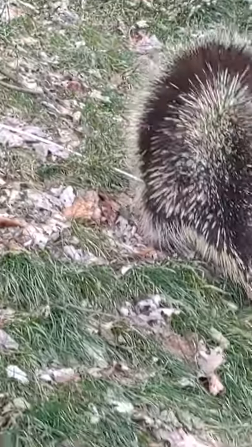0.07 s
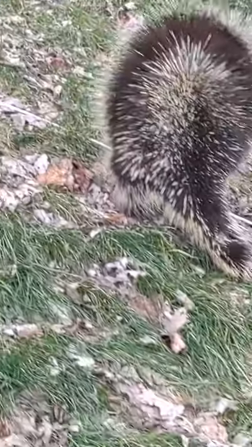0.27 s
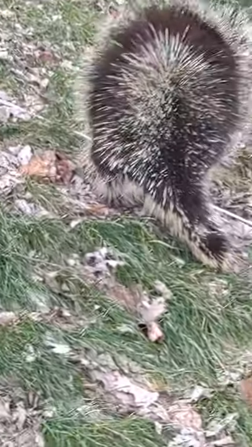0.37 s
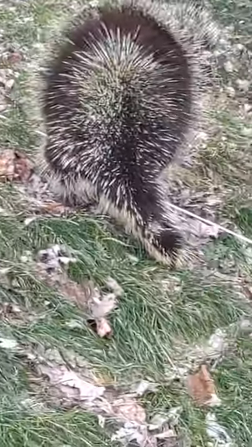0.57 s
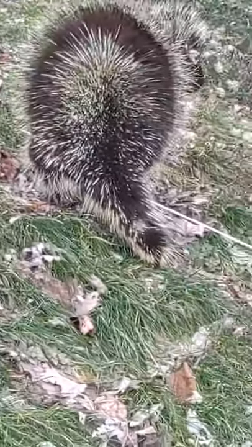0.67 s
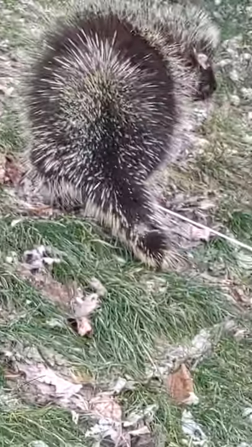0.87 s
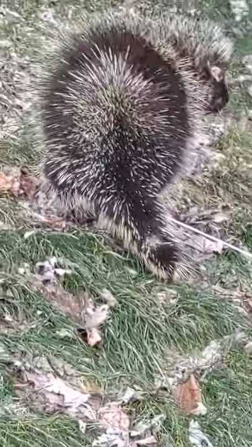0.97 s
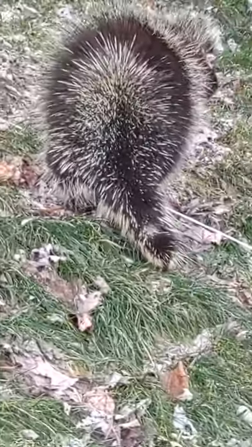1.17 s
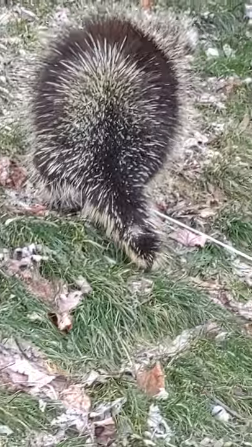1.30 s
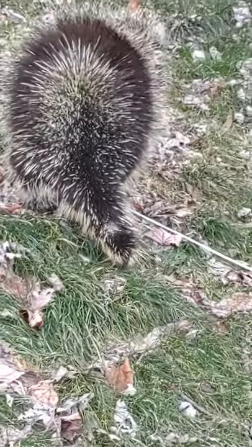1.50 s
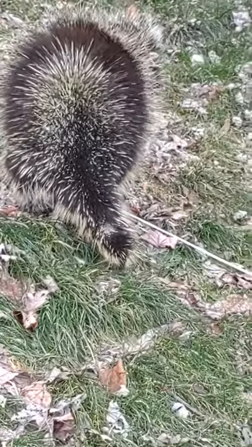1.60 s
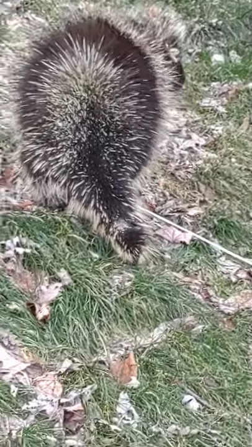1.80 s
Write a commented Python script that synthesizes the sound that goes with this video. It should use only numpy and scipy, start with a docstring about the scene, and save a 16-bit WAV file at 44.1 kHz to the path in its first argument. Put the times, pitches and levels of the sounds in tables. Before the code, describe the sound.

A crisp, hissy rustle of dry leaves comes in uneven surges as a nearby porcupine walks and drags its tail. Small stems snap and feet knock softly, then it briefly stops and resumes. The quiet yard hums faintly.

```python
"""A quiet yard with a faint low hum; a porcupine in grass and dry leaves, two metres or so from the mic.
It starts softly, each push of a foot or drag of the tail crushing leaves into a swarm of tiny fractures.
The hardest push comes near 0.35 s: single stems snap and the feet knock softly on the ground.
More pushes follow near 0.85 s and 1.35 s. It pauses around 1.6 s, then moves on at 1.8 s."""
import sys
import numpy as np
from scipy import signal
from scipy.fft import rfft, irfft
from scipy.io import wavfile

SR = 44100
rng = np.random.default_rng(int(sys.argv[2]) if len(sys.argv) > 2 else 0)


def wav_record(signal):
    """Record a signal, one row per channel, as 16-bit PCM in the file named by sys.argv[1]."""
    frames = np.transpose(np.atleast_2d(signal))
    bounded = np.clip(frames, -1, 1)
    # unit amplitude maps onto the largest positive 16-bit level
    quanta = np.round(bounded * 32767).astype(np.int16)
    wavfile.write(sys.argv[1], SR, quanta)


N = 81585

# pushes of feet and tail: peak t/s, level/dB, 20 dB rise/s, 20 dB fall/s, extra mids and grass level/dB
SHUFFLES = [(.015, -44.5, 0.37, .24, 3), (0.163, -46.5, .04, .05, 0), (0.218, -44.5, .03, .17, -0.5),
            (.3, -42, 0.25, .2, -0.5), (.364, -30.5, 0.04, .17, 0), (.42, -33.5, 0.12, .1, -4),
            (.458, -34, .05, 0.041, 1), (.578, -39, 0.15, 0.083, -3), (.674, -46, 0.022, 0.031, 2),
            (.732, -45, .02, .03, 4), (.798, -40.5, .05, .08, 0.5), (0.837, -34.5, 0.085, 0.09, 3),
            (.88, -41, .04, 0.17, 5.5), (1.073, -42, .27, 0.2, 0.5), (1.232, -52, 0.054, 0.36, -2),
            (1.335, -36.5, .1, 0.081, -1), (1.388, -37.5, 0.069, 0.03, -2.5),
            (1.419, -61, 0.03, 0.086, 7.5), (1.783, -43.5, .007, 0.13, 2), (1.848, -44.5, 0.035, .1, 2)]
# bright hiss of rustle and snaps, as the microphone colours it: f/Hz, level/dB
RUSTLE_TREBLE = [(3000, -45.5), (4700, -20), (5400, -14), (6200, -4), (7000, 4.5), (7550, 3), (8000, -11.5),
                 (8500, -26.5)]
# mid crackle of rustle and snaps, as the microphone colours it: f/Hz, level/dB
RUSTLE_MIDS = [(400, -39), (1080, -18.5), (1340, -8.5), (1500, -11.5), (1720, -1.5), (1900, -4),
               (2200, -10), (2650, -4.5), (3150, -7), (3750, 3), (4350, 0.5), (4800, -7.5), (5450, 3),
               (6200, -5), (7000, -26.5), (8200, -29.5)]
TICK_HZ, TOP_HZ = 6900, 8350  # centre of a snap's bright tick; the recorder's upper limit


def undb(db):
    """Decibels to gain."""
    return 10 ** (np.asarray(db) / 20)


def unit(x):
    """Scale to rms 1."""
    return x / np.sqrt(np.mean(x ** 2))


def freqs():
    """Frequency of each spectral bin."""
    return np.arange(N // 2 + 1) * SR / N


def gains(points):
    """Gain per bin from rows of f/Hz, level/dB."""
    hz, db = np.array(points).T
    return undb(np.interp(np.log(freqs() + 1), np.log(hz), db))


def resonance(hz, half_width_hz):
    """Gain per bin of a single peak."""
    return 1 / (1 + ((freqs() - hz) / half_width_hz) ** 2)


def colour(x, gain):
    """Filter by a gain per bin."""
    return irfft(rfft(x) * gain, N)


def noise(gain):
    """Coloured noise of rms 1."""
    return unit(colour(rng.standard_normal(N), gain))


def wander(below_hz):
    """Random motion of rms 1, rolling off above the given frequency."""
    return noise(1 / (1 + (freqs() / below_hz) ** 4))


def mic_dispersion(low_lag_s=.0009):
    """The microphone delays lows about 1 ms, so each click chirps slightly downward."""
    lag = low_lag_s * np.clip(1 - freqs() / TICK_HZ, -1, 1)
    return np.exp(-2j * np.pi * np.cumsum(lag) * SR / N)


def yard(air_db=-68, hum_hz=85.6):
    """The bed of the place: quiet outdoor air and a wavering low hum."""
    # spectrum of the air: f/Hz, level/dB
    air_spectrum = [(20, -31.5), (30, -21.5), (42, 0.5), (55, -15.5), (83, -3), (110, -8), (180, -11.5),
                    (290, -19), (390, -10), (500, -18), (1050, -16.5), (1800, -15), (2300, -19),
                    (4000, -17.5), (7300, -18), (8500, -47)]
    # course of the hum: t/s, level/dB
    hum_levels = [(0, -66), (.35, -85), (.45, -68.5), (.56, -66), (.63, -66.5), (.72, -77), (.9, -72),
                  (1.05, -82.5), (1.4, -78), (1.65, -76.5), (1.85, -89)]
    hum_gain = undb(np.interp(np.arange(N) / SR, *np.array(hum_levels).T))
    hum = hum_gain * noise(resonance(hum_hz, half_width_hz=6.8))
    return undb(air_db) * noise(gains(air_spectrum)) + hum


def litter_echo(x, echo_db=-16.5, decay_s=.0053):
    """The direct sound reaches the mic with a short diffuse tail, scattered off the leaf litter."""
    t = np.arange(N) / SR
    tail = rng.standard_normal(N) * np.exp(-t / decay_s) * np.minimum(t / decay_s, 1)
    return x + undb(echo_db) * signal.fftconvolve(x, tail / np.linalg.norm(tail))[:N]


def foot_knocks(ring_cycles=.7, grit_cycles=1.9):
    """Feet strike ground and buried twigs: heavily damped, slightly gritty, little below their pitch."""
    # footfalls: t/s, level/dB, f/Hz
    footfalls = [(.103, -38, 1050), (.157, -41.5, 800), (.322, -39, 700), (0.328, -48.5, 190),
                 (0.353, -46, 420), (0.353, -47, 165), (0.399, -50, 330), (.452, -52.5, 109),
                 (0.474, -47.5, 283), (0.478, -59, 119), (.849, -28.5, 790), (0.868, -44, 1050),
                 (.876, -53.5, 850), (1.347, -45, 1200), (1.351, -38, 1050), (1.8, -51, 300)]
    out = 0
    for at, db, hz in footfalls:
        cycles = np.maximum(np.arange(N) / SR - at, 0) * hz
        ring = np.sin(2 * np.pi * cycles) * np.exp(-cycles / ring_cycles)
        grit = .35 * wander(2 * hz) * np.minimum(cycles, 1) * np.exp(-cycles / grit_cycles)
        low_cut = signal.butter(2, .7 * hz, "high", fs=SR, output="sos")
        out = out + undb(db) * signal.sosfilt(low_cut, ring + grit)
    return out


def stem_snaps(level_db=-3, splinter_db=-4.5, splinter_s=.0006):
    """A stem or leaf rib gives way, then tears on briefly: a bright tick over a midrange crack."""
    # snaps: t/s, relative tick level/dB, relative mids level/dB
    snaps = [(0.0404, -44, -72), (0.1604, -39, -37), (0.196, -25.5, -50), (.201, -19.5, -39.5),
             (0.205, -29.5, -36), (0.3101, -24, -34), (0.3154, -16.5, -17.5), (0.3341, -28, -24),
             (.352, -7.5, -18), (0.354, -25, -12), (0.3628, -33.5, -29), (.3638, -11.5, -30),
             (0.3655, -22, -23), (0.387, -16, -22.5), (.4206, -20, -33), (.4357, -23.5, -23.5),
             (0.4923, -21, -55), (0.5693, -21.5, -52), (0.5716, -26.5, -40), (0.577, -15.5, -43),
             (0.5814, -18, -32), (0.585, -22.5, -48), (0.7041, -35, -39), (0.7494, -49, -32),
             (0.7691, -23.5, -29.5), (0.8299, -32.5, -19.5), (0.8659, -32, -23.5), (.8775, -30, -31.5),
             (.913, -23, -33), (.9165, -41.5, -22.5), (0.9455, -24.5, -30.5), (0.9701, -17, -25),
             (1.0082, -25, -42.5), (1.078, -26, -33), (1.1795, -50, -33), (1.1912, -33.5, -61),
             (1.2024, -31, -36.5), (1.3244, -25.5, -38), (1.3522, -19.5, -30), (1.3775, -18, -48),
             (1.3849, -37, -28), (1.3998, -13.5, -31), (1.449, -52, -41), (1.47, -51, -50),
             (1.599, -54, -49), (1.645, -49.5, -53), (1.785, -43, -30)]
    at, tick_db, mids_db = np.array(snaps).T
    t = np.arange(SR // 200) / SR
    splinters = rng.standard_normal((len(at), len(t))) * t * np.exp(-t / splinter_s)
    splinters /= np.linalg.norm(splinters, axis=1)[:, None]
    tears = (t == 0) + undb(splinter_db) * splinters  # the break, then its splintering
    samples = (at[:, None] * SR).astype(int) + np.arange(len(t))
    bright = gains(RUSTLE_TREBLE) * resonance(TICK_HZ, half_width_hz=2800)
    out = 0
    for db, gain in ((tick_db, bright), (mids_db, gains(RUSTLE_MIDS))):
        pulses = np.bincount(samples.ravel(), (undb(db)[:, None] * tears).ravel(), N)[:N]
        response = gain * mic_dispersion()
        click_peak = abs(irfft(response, N)).max()
        out = out + colour(pulses, response) / click_peak
    return undb(level_db) * out


def crush(peaks_db, rest_db=-73):
    """Strength of the crushing: each shuffle swells and dies away, over leaves settling at rest."""
    t = np.arange(N) / SR
    power = undb(rest_db) ** 2
    for (at, _, rise, fall, _), db in zip(SHUFFLES, peaks_db):
        drop_db = 20 * np.maximum((at - t) / rise, (t - at) / fall)
        power = power + undb(db - drop_db) ** 2
    return np.sqrt(power)


def fractures(push, size_spread_db=2.5, colour_spread_db=4.5, clump_db=1.5):
    """Tiny breaks, each with its own size and colour; harder pushes break more leaves a second."""
    per_second = 3600 * (push / undb(-41.5)) ** .32
    breaks = rng.random(N) < per_second / SR
    size = undb(size_spread_db * np.minimum(rng.standard_normal(N), 2.46))
    polarity = rng.choice([-1, 1], N)
    clumps = undb(clump_db * wander(below_hz=45))  # leaves give way in clumps
    clicks = breaks * size * polarity * clumps / np.sqrt(per_second)  # same power at any rate
    centres_hz, spacing_hz = np.linspace(0, TOP_HZ, 7, retstep=True)
    swarm = 0
    for hz in centres_hz:
        band = np.maximum(1 - abs(freqs() - hz) / spacing_hz, 0)
        click_gains = undb(colour_spread_db * np.clip(rng.standard_normal(N), -2, 1))
        swarm = swarm + colour(clicks * click_gains, band * mic_dispersion())
    return swarm


def leaf_rustle(mids_db=-7.5, grass_db=-28.5):
    """Leaves fracture under feet and tail: bright hiss and mid crackle at the mic, over crushed grass."""
    # spectrum of the grass crushed under the leaves: f/Hz, level/dB
    grass_spectrum = [(25, -23), (70, -18), (130, -4.5), (400, -2), (900, -0.5), (1500, -5), (4000, -44)]
    _, push_db, _, _, extra_db = np.array(SHUFFLES).T
    push = crush(push_db)
    swarm = fractures(push)
    treble = unit(colour(swarm, gains(RUSTLE_TREBLE)))
    mids = undb(mids_db) * unit(colour(swarm, gains(RUSTLE_MIDS)))
    grass = undb(grass_db) * unit(colour(swarm, gains(grass_spectrum)))
    return treble * push + (mids + grass) * crush(push_db + extra_db)


def scene():
    """The porcupine in the leaves, over the yard, at one mono microphone."""
    porcupine = leaf_rustle() + stem_snaps() + foot_knocks()
    return (litter_echo(porcupine) + yard())[None]


def record(dry):
    """The recorder cuts the top steeply."""
    high_cut = signal.ellip(8, .1, 45, TOP_HZ, fs=SR, output="sos")
    return signal.sosfiltfilt(high_cut, dry)


dry = scene()
out = record(dry)
wav_record(out)
```